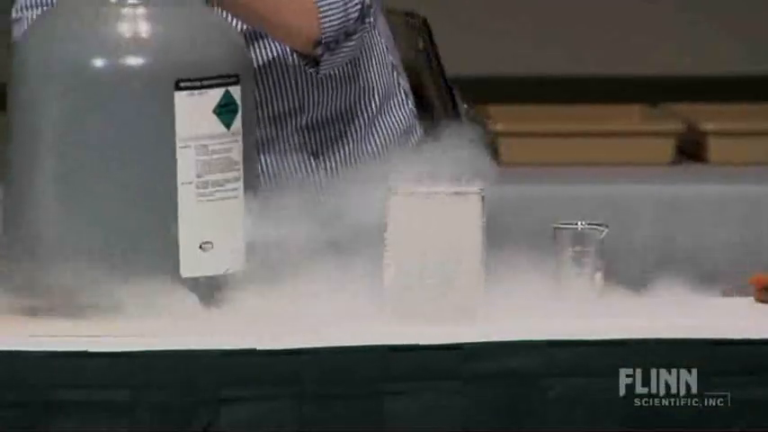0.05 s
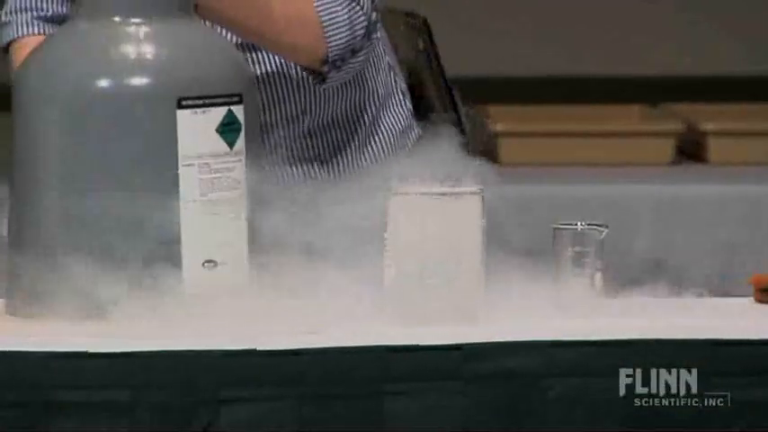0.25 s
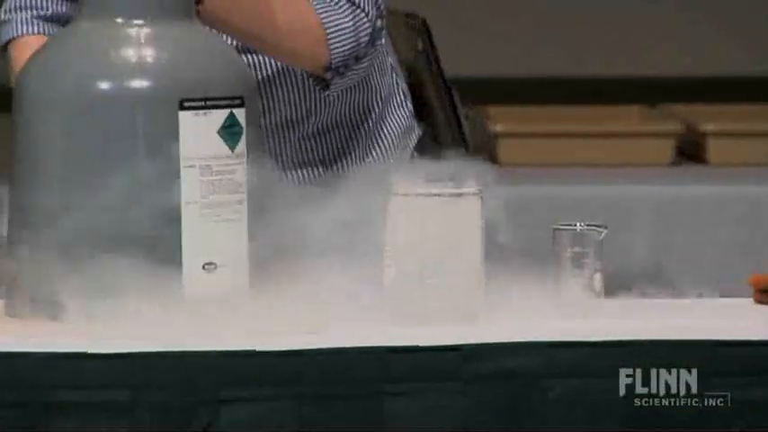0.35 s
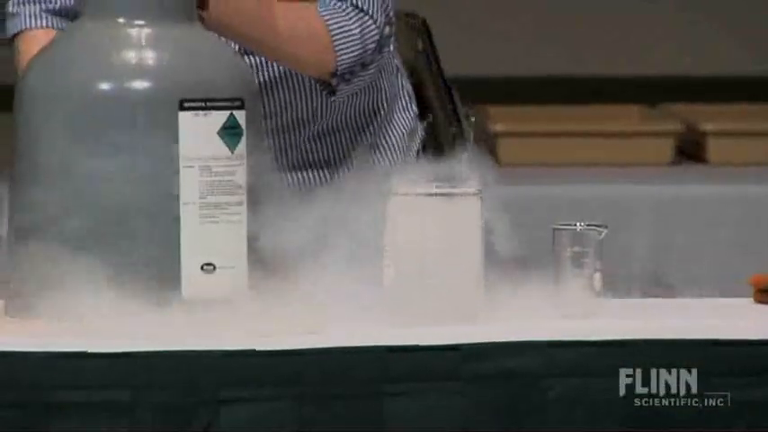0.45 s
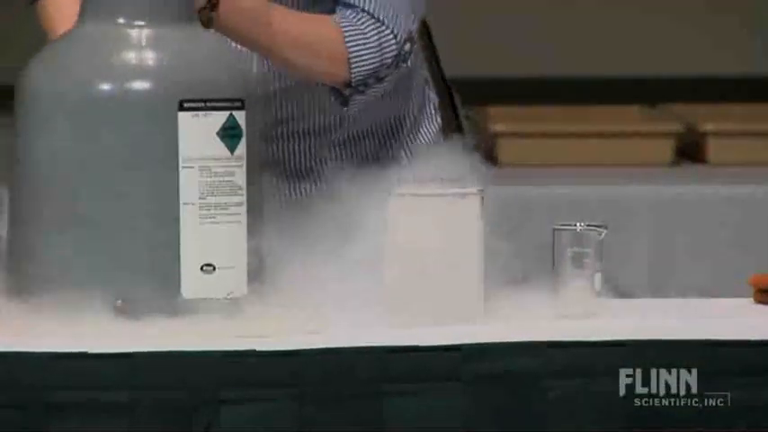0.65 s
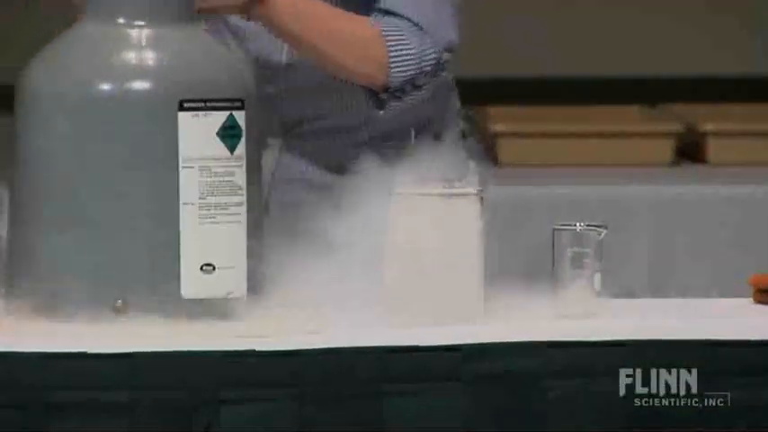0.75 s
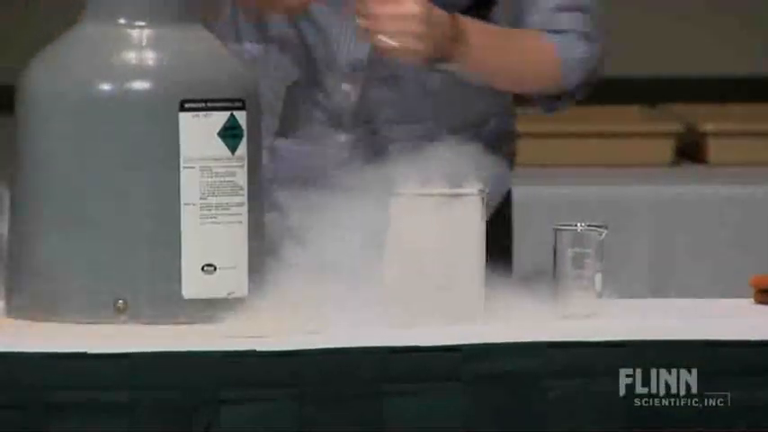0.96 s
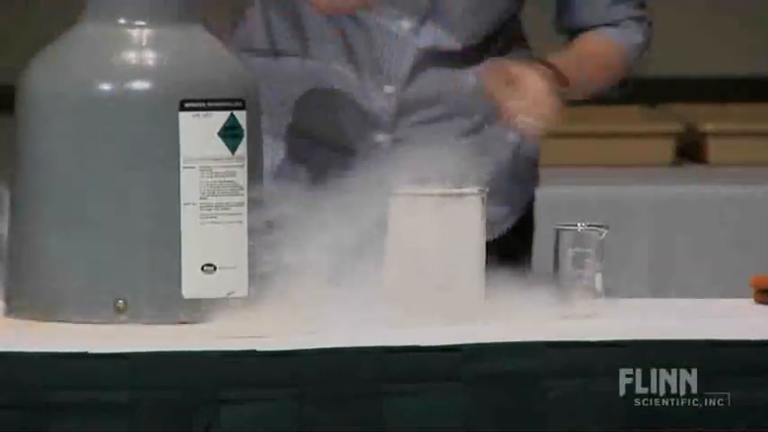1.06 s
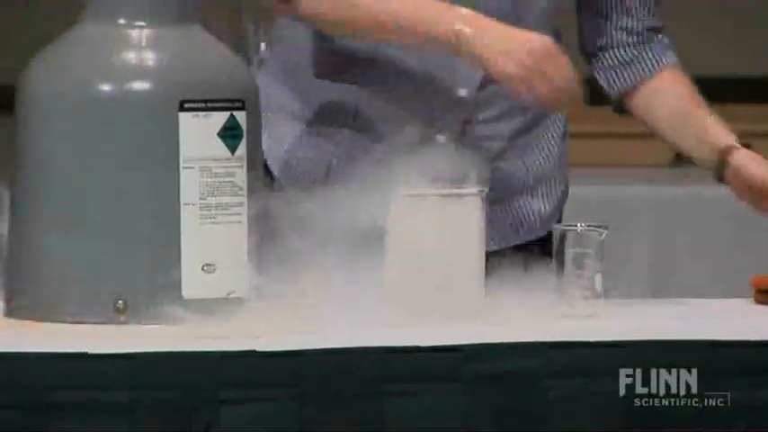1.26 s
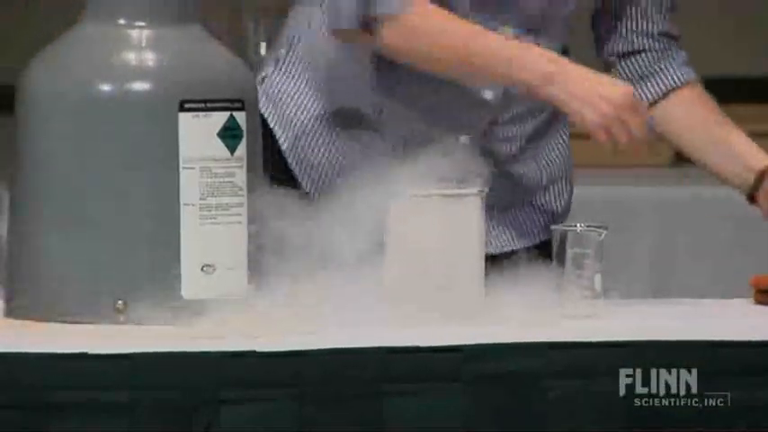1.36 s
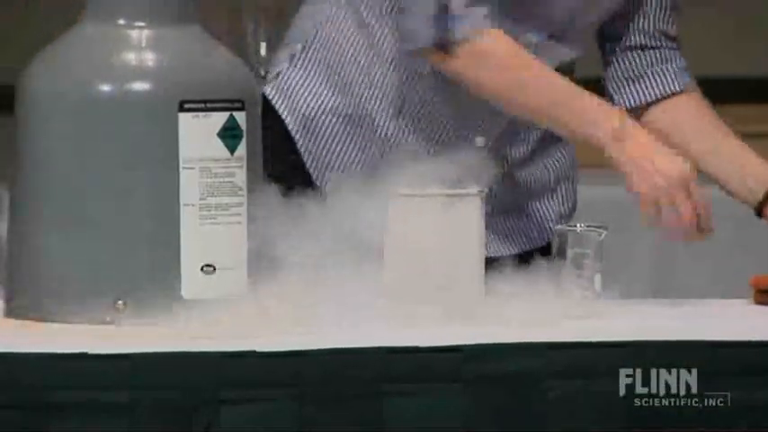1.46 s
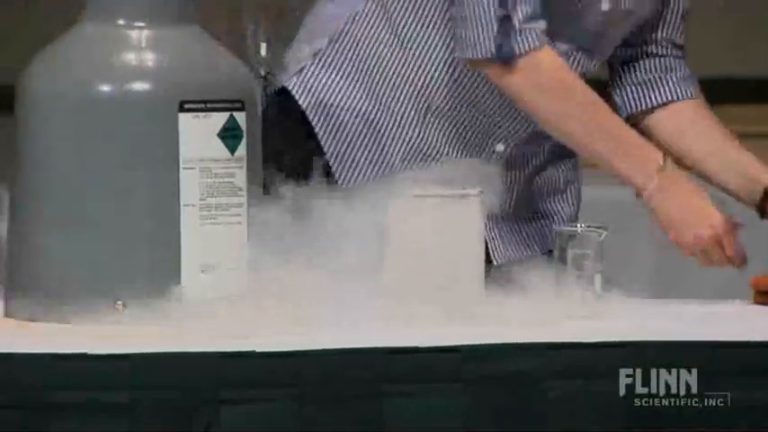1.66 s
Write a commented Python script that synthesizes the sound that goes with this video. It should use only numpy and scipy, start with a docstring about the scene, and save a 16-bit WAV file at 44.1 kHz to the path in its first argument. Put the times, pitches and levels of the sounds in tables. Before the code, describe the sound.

A heavy metal tank is set on a table with a deep, briefly ringing thump, then a clack as its base drops. A few light knocks and a faint sleeve rustle follow in a quiet room.

```python
"""Setting down a metal tank

A heavy tank is set on a lab table in a quiet room: one edge lands with a deep thump, then the base drops
with a clack. Each impact thuds the table top, clatters the foot and excites the damped modes of the
steel shell; the foot grinds by friction as it tips and settles. Hands slide off, and a few light knocks
and a rustle of sleeves follow, over ventilation rumble and hiss."""
import sys
import numpy as np
from scipy import signal
from scipy.fft import rfft, irfft
from scipy.io import wavfile

SR = 44100
rng = np.random.default_rng(int(sys.argv[2]) if len(sys.argv) > 2 else 0)


def generate_wav(signal):
    """Clip the signal to [-1, 1] and save it as 16-bit WAV at the path in sys.argv[1]."""
    frames = np.transpose(np.atleast_2d(signal))
    scaled = np.clip(frames, -1, 1) * 32767
    pcm = np.round(scaled).astype(np.int16)
    wavfile.write(sys.argv[1], SR, pcm)


N = 74970
T = np.arange(N) / SR


def undb(db):
    """Amplitude ratio of a level in decibels."""
    return 10 ** (np.asarray(db) / 20)


def unit(x):
    """Normalisation to rms 1."""
    return x / np.sqrt(np.mean(x ** 2))


def gains(spectrum, hz):
    """Gains of an (f/Hz, level/dB) curve, interpolated in log frequency."""
    f, db = np.array(spectrum, float).T
    return undb(np.interp(np.log(hz + 1), np.log(f), db))


def noise(spectrum):
    """Spectral shaping of white noise, rms 1."""
    return unit(irfft(rfft(rng.standard_normal(N)) * gains(spectrum, np.fft.rfftfreq(N, 1 / SR)), N))


def decay(t60):
    """Exponential damping: 60 dB in t60 seconds."""
    return np.exp(-np.log(1000) * T / t60)


def at(start, x):
    """Time delay of start seconds."""
    return np.concatenate([np.zeros(int(max(start, 0) * SR)), x])[:N]


def ring(modes):
    """Free vibration: a superposition of damped sinusoids."""
    return sum(undb(db) * decay(t60) * np.sin(2 * np.pi * hz * T) for hz, db, t60 in modes)


# Air noise spectrum: f/Hz, level/dB
AIR_SPECTRUM = [(20, -17.5), (45, -22.5), (75, -17.5), (100, -5), (140, 1.5), (250, -9.5), (450, -13),
                (750, -16), (970, -10), (1400, -20), (2500, -21), (5000, -25.5), (12000, -29.5)]

def ventilation():
    """Stationary broadband noise: the rumble and hiss of moving air."""
    return undb(-55.5) * noise(AIR_SPECTRUM)


# Colour of the reverberation: f/Hz, level/dB
ROOM_SPECTRUM = [(60, -12), (200, -7), (800, 5), (2500, -5.5), (5000, -9.5), (12000, -12)]

def reverberation(x):
    """Diffuse wall reflections: convolution with a decaying noise tail."""
    tail = rng.standard_normal(N) * decay(t60=.27)
    tail /= np.sqrt(np.sum(tail ** 2))
    colour = gains(ROOM_SPECTRUM, np.fft.rfftfreq(2 * N, 1 / SR))
    tail = irfft(rfft(tail, 2 * N) * colour)[:N]
    return undb(-11) * signal.fftconvolve(x, at(.012, tail))[:N]


# Strokes of foot, hands and sleeves: t/s, duration/s, level/dB
GRINDS = [(.0, 0.17, -49.5), (.16, 0.087, -46.5), (.35, 0.23, -49.5), (.74, 0.13, -58.5)]
SLIDES = [(.7, 0.29, -55)]
RUSTLES = [(.84, 0.4, -56), (1.42, 0.25, -66)]
# Their spectra: f/Hz, level/dB
GRIND_SPECTRUM = [(50, -17), (100, -8), (190, -12), (245, 13), (320, 5.5), (450, -7.5), (650, 2.5),
                  (1000, -5), (1500, -12.5), (2700, -11.5), (5000, -25.5), (12000, -56)]
SLIDE_SPECTRUM = [(100, -15), (500, 3), (700, 10.5), (1000, 10.5), (1500, -5), (3000, -3.5), (6000, -7.5),
                  (12000, -11.5)]
RUSTLE_SPECTRUM = [(60, -16), (150, -8), (500, 6), (1000, 5.5), (1400, 2), (1950, 7.5), (3000, -14),
                   (7000, -15.5), (12000, -10.5)]

def friction(strokes, spectrum, catch_hz, uneven_db):
    """Stick-slip friction: noise modulated by an uneven grip, swelling and fading with each stroke."""
    grip = np.interp(T * catch_hz, np.arange(N), rng.standard_normal(N))
    envelope = sum(undb(db) * np.sin(np.pi * np.clip((T - start) / duration, 0, 1))
                   for start, duration, db in strokes)
    return unit(noise(spectrum) * undb(uneven_db * grip)) * envelope


def thud(hz, peak_s):
    """Heavily damped oscillation of the table top, building up while the load presses."""
    return (T / peak_s * np.exp(1 - T / peak_s)) ** 2 * np.sin(2 * np.pi * hz * T)


# Knocks on the table: t/s, f/Hz, thud level/dB, time to peak/s, click level/dB
KNOCKS = [(0.959, 230, -40.5, 0.0013, -43), (1.0459, 195, -30.5, 0.0024, -42),
          (1.056, 93.5, -37.5, 0.0032, -71), (1.484, 400, -51, 0.00051, -42.5)]
# Contact click spectrum: f/Hz, level/dB
CLICK_SPECTRUM = [(100, -21), (500, 11.5), (1200, 3.5), (2500, -20), (12000, -25)]

def knocks():
    """Light impacts: each gives a low thud and a broadband contact click."""
    out = 0
    for start, hz, thud_db, peak_s, click_db in KNOCKS:
        click = noise(CLICK_SPECTRUM) * np.exp(-T / .0019)
        out += at(start, undb(thud_db) * thud(hz, peak_s) + undb(click_db) * click)
    return out


# Snaps of grit: t/s, level/dB
SNAPS = [(0.3, -46), (0.5553, -36.5)]

def grit():
    """Impulsive noise: grit snaps in very short, bright bursts."""
    spectrum = [(500, -20), (3000, 6), (5500, 1), (12000, -5)]  # f/Hz, level/dB
    return sum(at(start, undb(db) * noise(spectrum) * np.exp(-T / .0008)) for start, db in SNAPS)


# Tinkles: t/s, f/Hz, level/dB, T60/s
TINKLES = [(.719, 3096, -41, 0.033), (0.9986, 4780, -44.5, 0.009)]

def tinkles():
    """Free vibration of small metal parts, one mode each."""
    return sum(at(start, ring([mode])) for start, *mode in TINKLES)


# Modes of the table and the tank's cavity: f/Hz, level/dB re thud, T60/s
TABLE_MODES = [(92.6, -33.5, 0.86), (157.9, -31, 0.52), (214, -27, 0.35), (244.1, -32, 0.91)]

def table_top(hz, peak_s=.0055):
    """Resonance: low modes build up with the thud and sound on after it."""
    return thud(hz, peak_s) + ring(TABLE_MODES) * (1 - np.exp(-T / peak_s))


# Bass, middle, presence and treble of the clatter: f/Hz
CLATTER_HZ = [200, 1300, 2200, 8000]

def clatter(levels):
    """Dense modes of foot and table act as half-octave noise bands; damping grows with frequency."""
    f = np.fft.rfftfreq(N, 1 / SR)
    white = rfft(rng.standard_normal(N))
    out = 0
    for hz in 90 * 2 ** (np.arange(15) / 2):
        envelope = decay(t60=.049 * (hz / 1000) ** -.21)
        band = irfft(white * (abs(np.log2((f + 1) / hz)) < 1 / 4), N) * envelope
        band *= np.sqrt(np.sum(envelope ** 2) / np.sum(band ** 2))
        out += band * gains(list(zip(CLATTER_HZ, levels)), hz)
    return out


def steel(freqs, levels, t60s):
    """Modal superposition with random phase: each mode arrives up to one period late."""
    lags = rng.random(len(freqs))
    return sum(at(lag / hz, ring([(hz, db, t60)])) for hz, db, t60, lag in zip(freqs, levels, t60s, lags))


# Rim modes: f/Hz; level/dB landing on an edge; level/dB landing on the base
RIM_HZ = [1891, 2096, 2214, 2374, 2540, 2896, 3130, 3530, 3720, 4060, 5250, 5970]
RIM_EDGE_DB = [-17, -1.5, -14, -2.5, -2, -3.5, -7, -10, -11, -11, -11.5, -12.5]
RIM_BASE_DB = [-9.5, -24, -3.5, -4, -8.5, -4, -15, -17, -6, -10, -12.5, -23]

def foot_rim(on_edge):
    """High, short-lived modes of the steel rim; the place of contact sets their levels."""
    return steel(RIM_HZ, RIM_EDGE_DB if on_edge else RIM_BASE_DB, t60s=[.057] * len(RIM_HZ))


# Shell modes: f/Hz; level/dB on an edge; level/dB on the base; T60/s on an edge
SHELL_HZ = [349, 492, 622.5, 700, 742, 806, 908, 953, 1106, 1160, 1320]
SHELL_EDGE_DB = [-4, -26, -2.5, -6, -14, -9, -13, -2, -17, -13.5, -10]
SHELL_BASE_DB = [-11, -17.5, 1.5, -10, -19, -31, -10.5, -37, -9.5, -20, -23]
SHELL_T60_S = [.3, .2, .2, .27, .2, .2, .22, .21, .14, .13, .13]

def shell(on_edge):
    """Contact damping: the shell's modes die sooner once the whole base rests on the table."""
    if on_edge:
        return steel(SHELL_HZ, SHELL_EDGE_DB, SHELL_T60_S)
    return steel(SHELL_HZ, SHELL_BASE_DB, .68 * np.array(SHELL_T60_S))


# Contacts of the foot: t/s, rise time/s, thud f/Hz, thud level/dB, shell level/dB,
# clatter level/dB in the bass, middle, presence and treble
CONTACTS = [ (.074, 0.018, 288, -41, -58, -62, -61, -58, -68),
            (0.183, .012, 241, -46, -47.5, -66, -53, -45.5, -88),
            (0.2363, 0.00049, 235, -8, -28.5, -30.5, -23.5, -43.5, -55),
            (0.252, 0.0013, 335, -47, -55, -53, -41, -45, -53.5),
            (0.27, 0.0032, 249, -50, -51, -44.5, -51, -30.5, -38.5),
            (.471, 0.0038, 230, -31.5, -45.5, -42, -46.5, -50, -55.5),
            (0.491, 0.0055, 312, -43, -51, -42.5, -47, -44, -52),
            (0.507, .002, 195.5, -27, -49, -40, -43.5, -48, -68),
            (.518, 0.00024, 145, -28.5, -26, -33, -31, -29, -37),
            (.540, 0.0083, 110, -38.5, -65, -40.5, -40, -48, -51),
            (.593, 0.0014, 130, -56, -66, -49.5, -75, -52, -55),
            (.718, 0.00073, 193, -62, -43, -62, -64, -48, -56),
            (.767, 0.002, 176, -55, -50, -53, -60, -59, -60)]

def tank(rocks_over_s=.4):
    """Impact excitation: each contact drives table, shell, rim and foot together."""
    out = 0
    for start, rise_s, hz, thud_db, shell_db, bass_db, middle_db, presence_db, treble_db in CONTACTS:
        on_edge = start < rocks_over_s
        metal = undb(shell_db) * shell(on_edge) + undb(presence_db) * foot_rim(on_edge)
        foot = clatter([bass_db, middle_db, presence_db, treble_db])
        attack = np.minimum(T / rise_s, 1)
        out += at(start, undb(thud_db) * table_top(hz) + (metal + foot) * attack)
    return out


def scene():
    """Superposition of high-passed impacts, their reverberation, friction and ventilation."""
    bass_cut = signal.butter(4, 92, "high", fs=SR, output="sos")
    impacts = signal.sosfilt(bass_cut, tank() + tinkles() + knocks() + grit())
    foot = friction(GRINDS, GRIND_SPECTRUM, catch_hz=119.8, uneven_db=2.2)
    hands = friction(SLIDES, SLIDE_SPECTRUM, catch_hz=89.3, uneven_db=2.5)
    sleeves = friction(RUSTLES, RUSTLE_SPECTRUM, catch_hz=59.5, uneven_db=2.0)
    return (impacts + reverberation(impacts) + foot + hands + sleeves + ventilation())[None]


def record(dry):
    """Band limiting: a steep low-pass filter at 12050 Hz."""
    return signal.sosfilt(signal.ellip(12, .2, 80, 12050, fs=SR, output="sos"), dry)


dry = scene()
out = record(dry)
generate_wav(out)
```